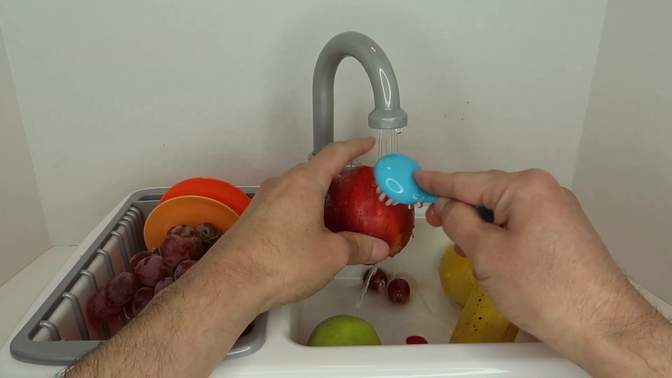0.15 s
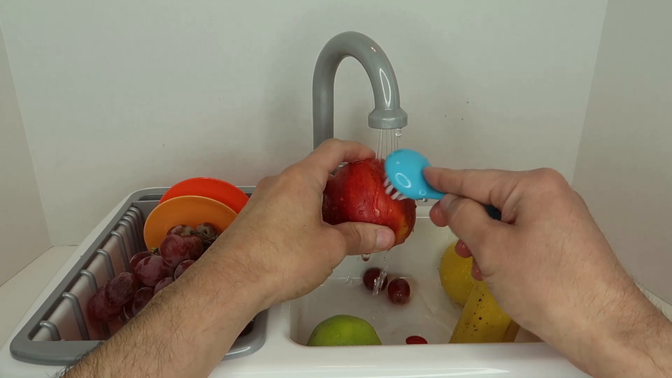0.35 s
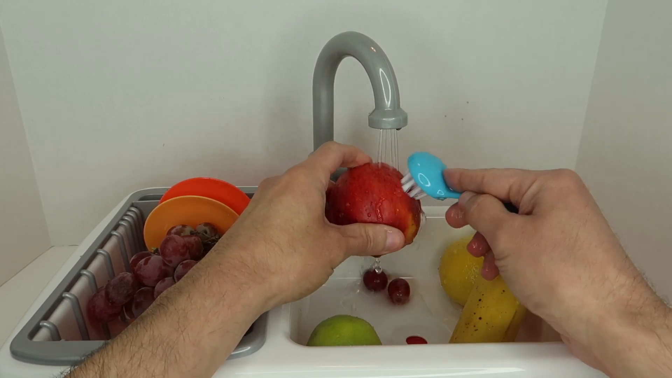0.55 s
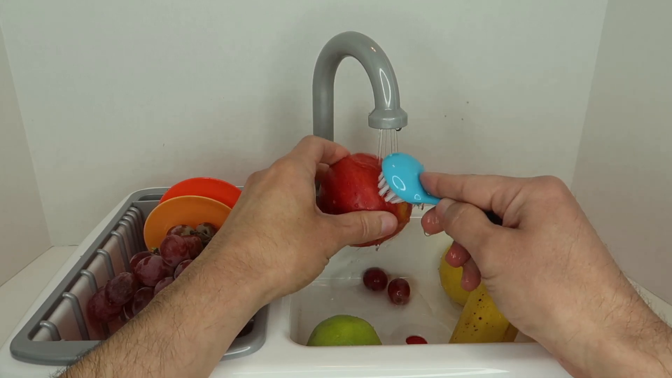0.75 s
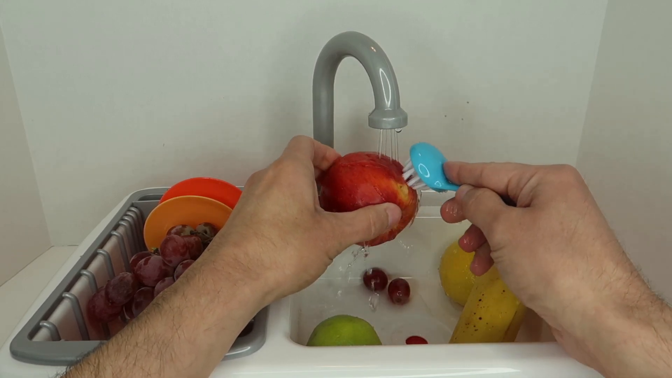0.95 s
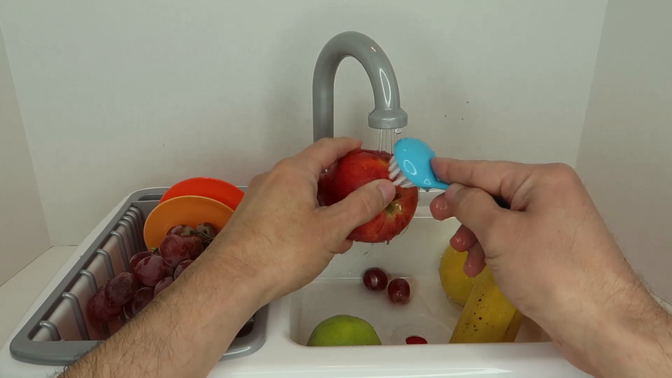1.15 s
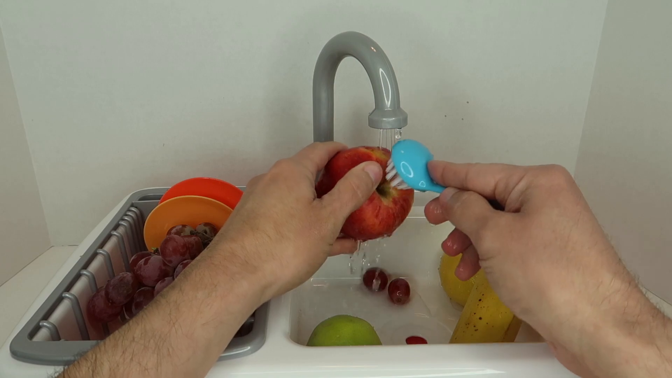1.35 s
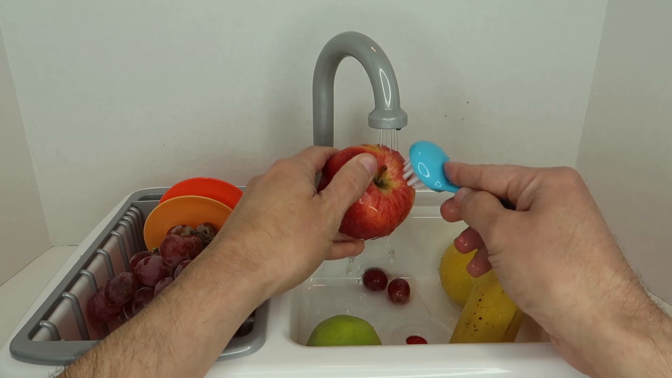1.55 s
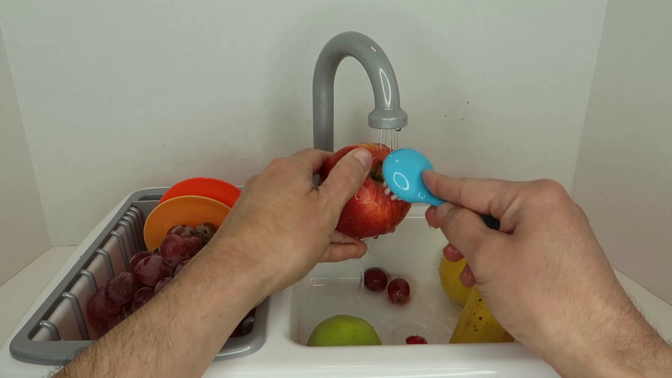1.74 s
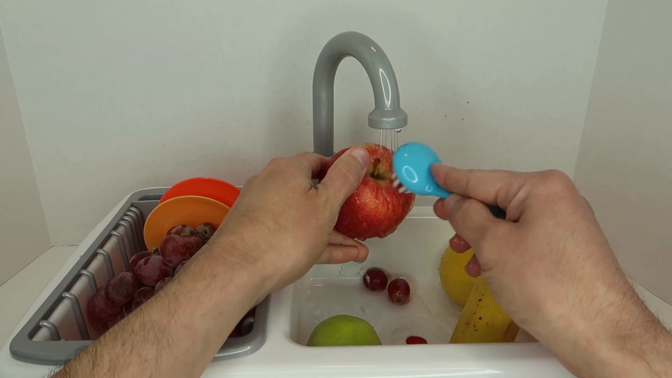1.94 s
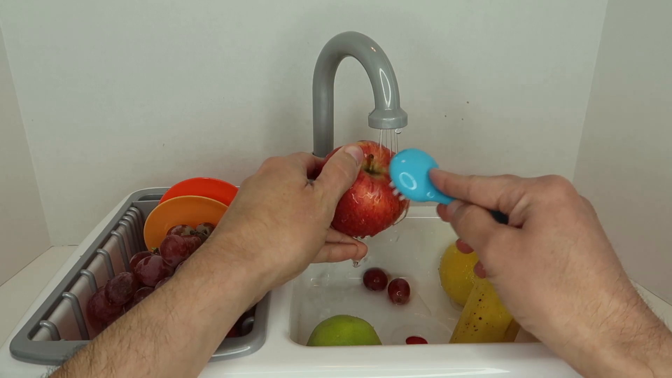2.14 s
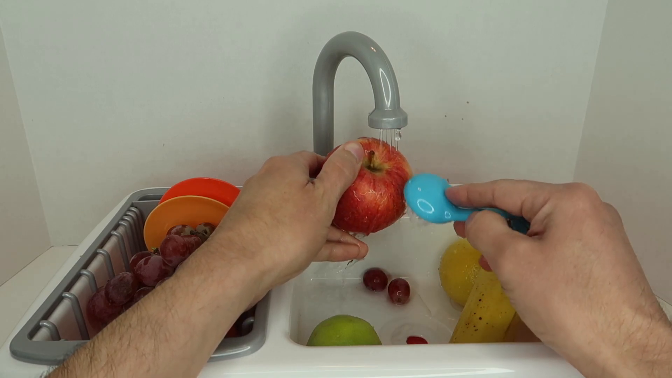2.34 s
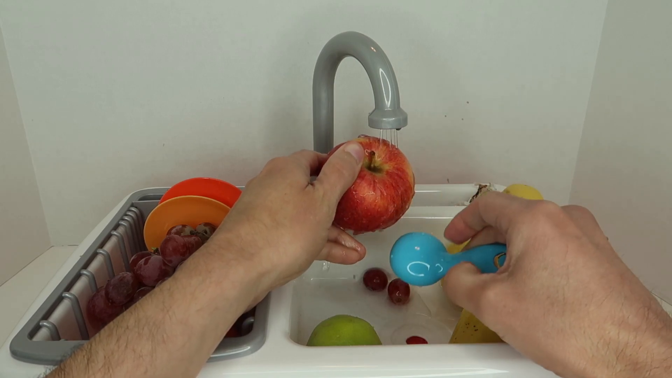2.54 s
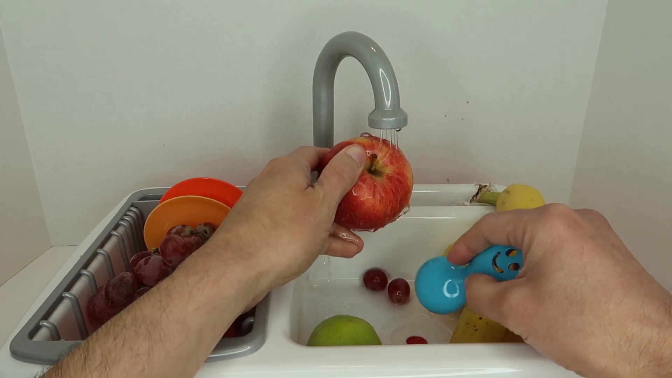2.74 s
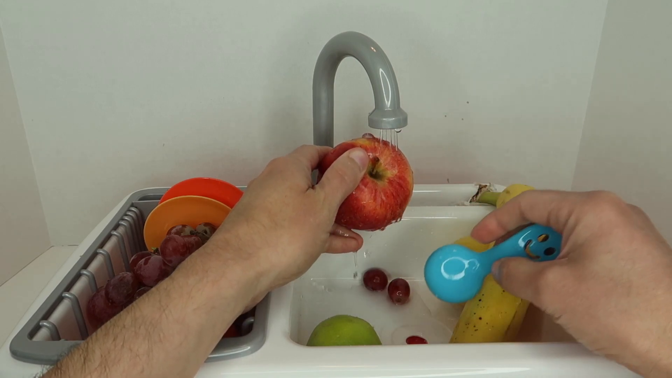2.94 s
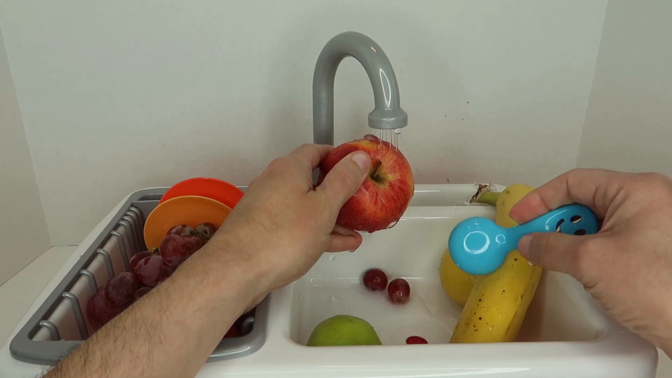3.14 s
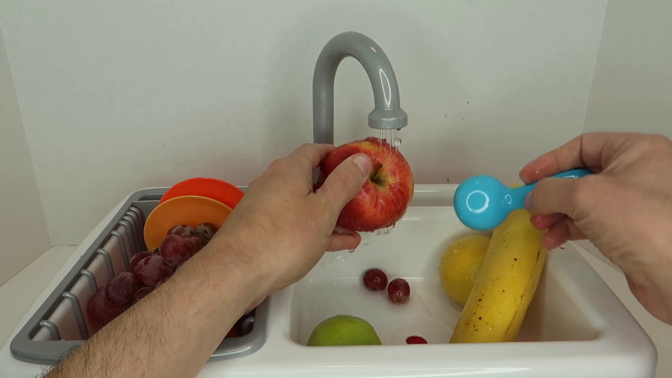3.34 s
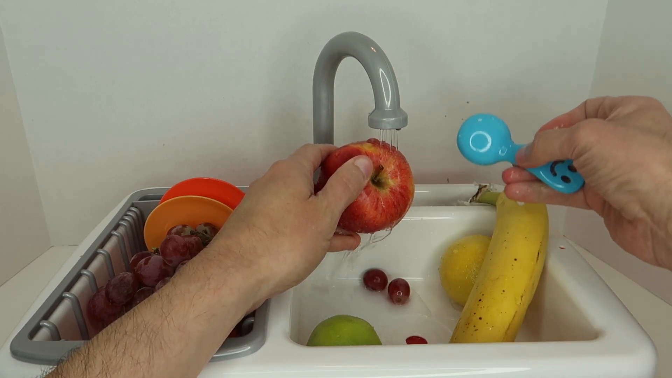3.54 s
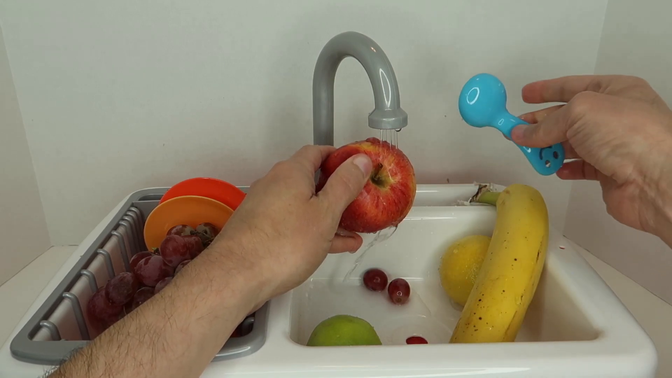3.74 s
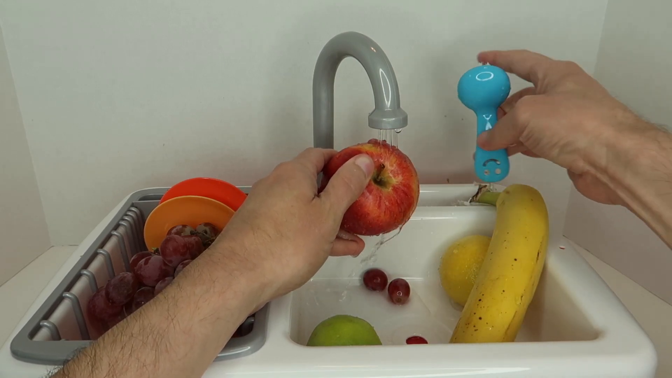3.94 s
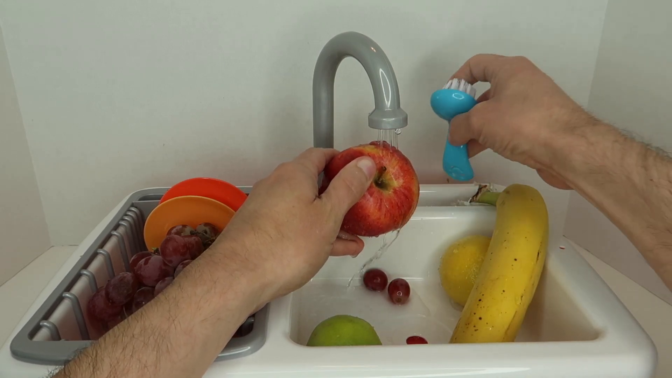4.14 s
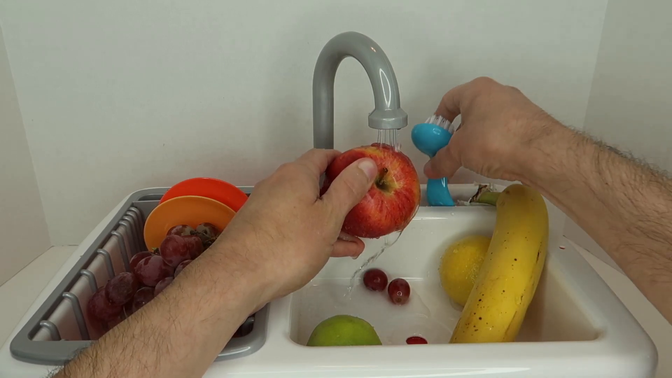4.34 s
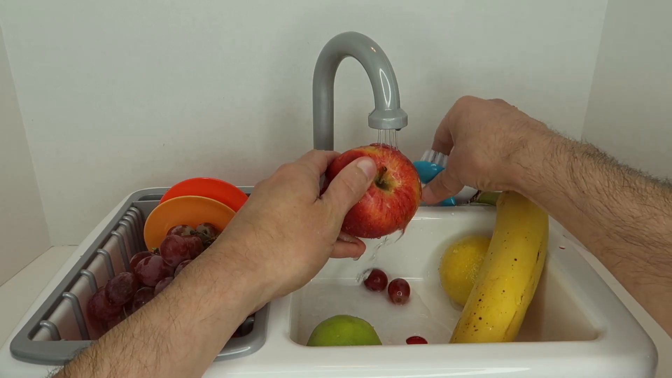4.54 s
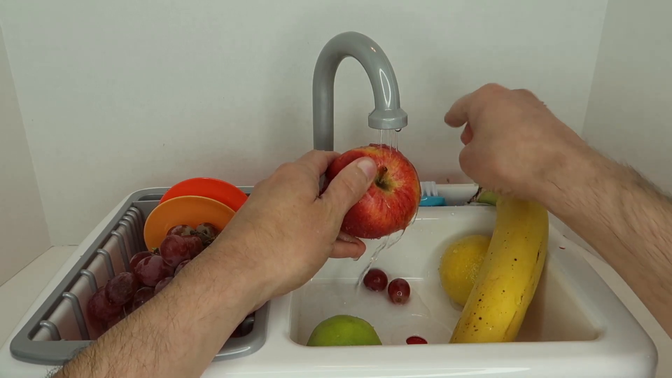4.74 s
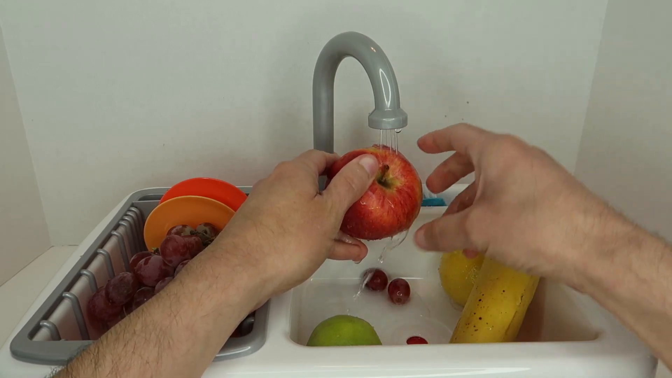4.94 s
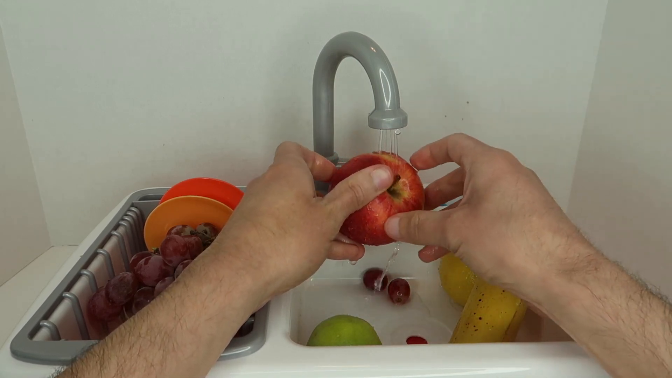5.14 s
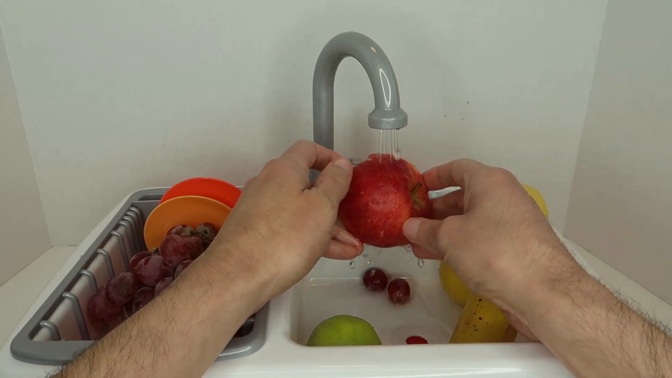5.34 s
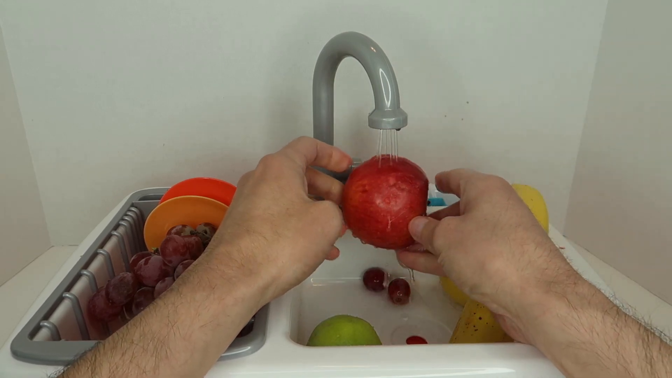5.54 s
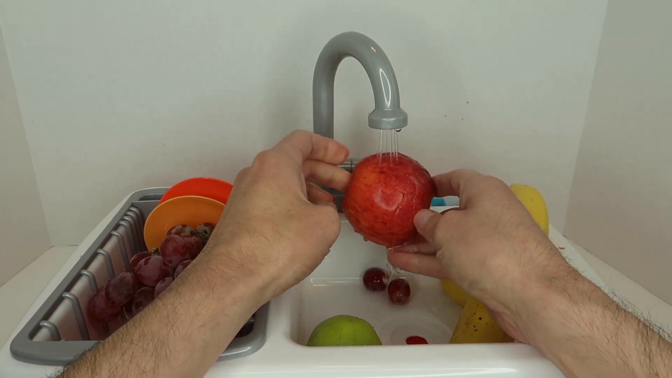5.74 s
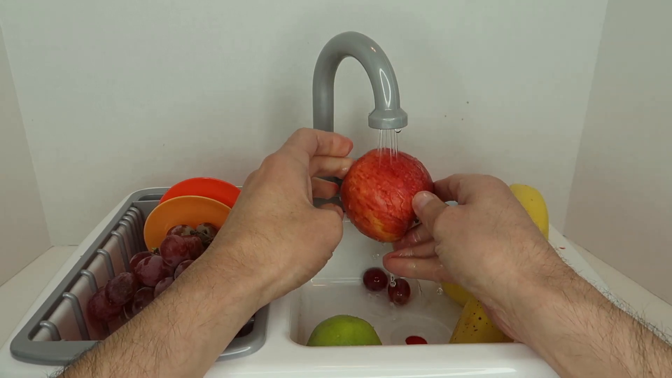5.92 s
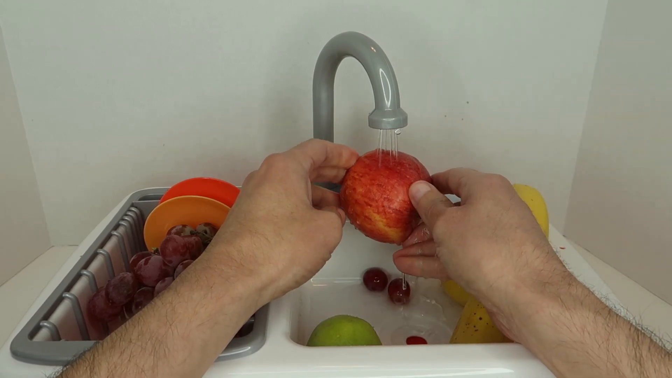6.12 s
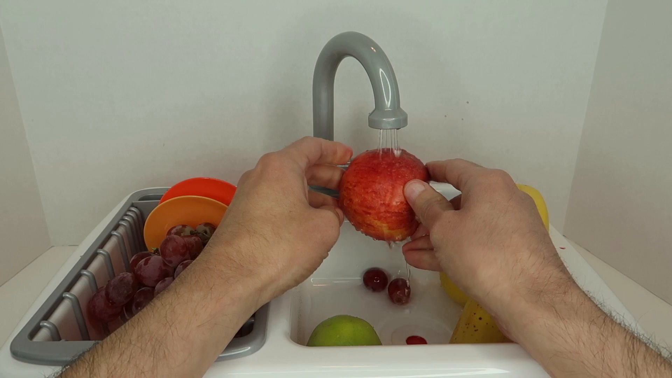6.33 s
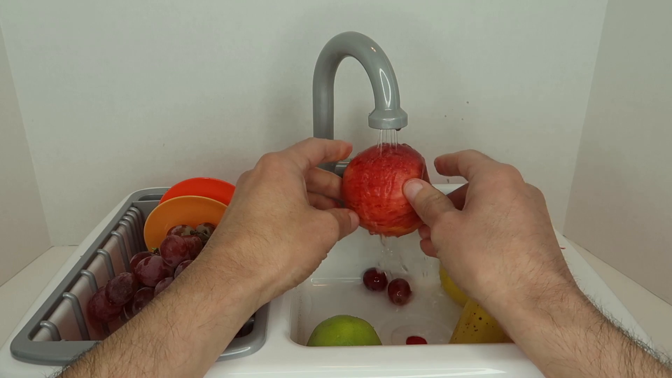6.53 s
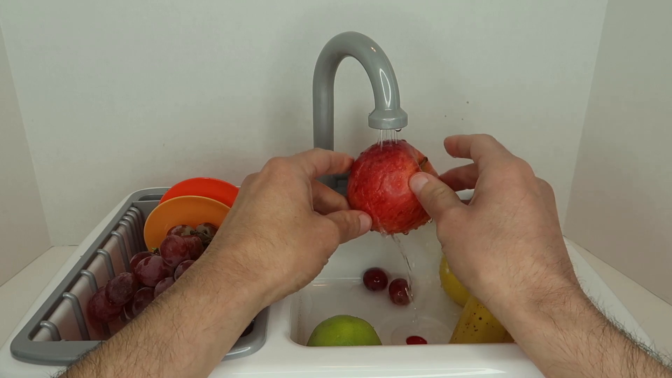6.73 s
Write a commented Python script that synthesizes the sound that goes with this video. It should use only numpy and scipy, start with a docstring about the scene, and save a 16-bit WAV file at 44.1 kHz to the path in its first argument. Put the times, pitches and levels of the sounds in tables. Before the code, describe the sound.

Throughout about 6.9 seconds, a toy sink's small battery pump whirs with a steady, slightly wavering buzz and quick gear rattle, above quiet room air and a low electrical hum. A thin, uneven trickle splashes over an apple and into a plastic basin. From 0 to 2.4 seconds a little brush scrubs with crisp, hissy strokes about six per second, with drips, small knocks and slight wet squeaks near 0.36 and 2.3. Scrubbing stops; sparse wet clicks continue. Soft low bumps accompany the reaching arm from 3.8 to 5. Light plastic taps at 4.44 and 4.67 precede a very loud hollow clatter at 4.8, bouncing until 4.9 with a short room tail. The close microphone overloads and the background ducks, recovering over the next couple of seconds. Pump and trickle carry on, with a sharper drip around 6.7 and stronger splashing at the end.

```python
"""A toy sink's battery pump hums and rattles while its thin stream trickles over an apple.
A small brush scrubs and knocks, then drops on the hollow plastic rim with a loud clatter.
Pump tones follow the shaft; gears, water and bristles are shaped noise; struck plastic is dying sines.
The near microphone overloads, ducks and recovers; a fridge motor and the mains hum low in the room."""
import sys
import numpy as np
from scipy import signal
from scipy.fft import rfft, irfft
from scipy.io import wavfile
from scipy.ndimage import uniform_filter1d

SR = 44100
rng = np.random.default_rng(int(sys.argv[2]) if len(sys.argv) > 2 else 0)


def put_to_file(sound):
    """Save the sound as 16-bit audio at rate SR, in the file named by the first command-line argument."""
    columns = np.atleast_2d(sound).T  # one column per channel
    safe = np.clip(columns, -1, 1)
    whole_steps = np.round(safe * 32767)
    wavfile.write(sys.argv[1], SR, whole_steps.astype(np.int16))


N = 303408
TIME = np.arange(N) / SR


def amp(db):
    """Decibels to gain."""
    return 10 ** (np.asarray(db) / 20)


def unit(x):
    """Scales to rms 1."""
    return x / np.sqrt(np.mean(x ** 2) + 1e-20)


def curve(rows):
    """Joins (t/s, value) rows by straight lines."""
    return np.interp(TIME, *np.transpose(rows))


def read(points, hz):
    """Reads (f/Hz, value) rows on a log-frequency axis."""
    f, value = np.transpose(points)
    return np.interp(np.log(hz + 1), np.log(f + 1), value)


def add(mix, s, sound):
    """Adds a sound at time s."""
    part = mix[round(s * SR):][:len(sound)]
    part += sound[:len(part)]


def colour(x, points, peaks=(), size=8192):
    """Causal filter of unit energy from a spectrum and resonant lifts."""
    hz = abs(np.fft.fftfreq(size, 1 / SR))
    db = read(points, hz)
    for f, width, lift in peaks:
        db = db + lift / (1 + (2 * (hz - f) / width) ** 2)
    # minimum phase: the filter answers as early as its spectrum allows
    spectrum = np.exp(np.conj(signal.hilbert(np.log(amp(db)))))
    taps = np.fft.ifft(spectrum).real[:size // 2]
    return signal.oaconvolve(x, taps / np.linalg.norm(taps))[:len(x)]


def dying(t60, size=8192):
    """Exponential decay, down 60 dB after t60 seconds."""
    return np.exp(-np.log(1000) * TIME[:size] / t60)


def burst(t60, size=8192):
    """A dying puff of noise."""
    return rng.standard_normal(size) * dying(t60)


def wander(hz, size=16384):
    """Slow chance of rms 1, up to about hz."""
    real, imaginary = rng.standard_normal((2, size))
    fade = np.exp(-(np.arange(size) * SR / N / hz) ** 2)
    return unit(irfft((real + 1j * imaginary) * fade, N))


def ringing(modes):
    """A struck object: dying sines from (f/Hz, level/dB, t60/s) rows."""
    return sum(amp(db) * np.sin(2 * np.pi * hz * TIME[:8192]) * dying(t60) for hz, db, t60 in modes)


# pump speed before its waver: t/s, speed/(turns/s)
PUMP_SPEED = [(0, 27.83), (1.2, 27.82), (2.7, 27.9), (4.4, 27.765), (6.88, 27.85)]


def shaft(wobble_turns=0.006):
    """Turns of the pump shaft so far, wavering with the load."""
    return np.cumsum(curve(PUMP_SPEED)) / SR + wobble_turns * wander(7.5)


# pump tones before flutter: multiple of the turning rate, rms level/dB
PUMP_TONES = [(7, -62.5), (8, -60.5), (9, -63), (11, -63.5), (12, -57), (13, -61), (14, -61), (15, -60),
              (16, -50), (17, -60), (18, -60), (21, -59), (22, -68.5), (24, -65.5), (26, -66), (27, -62),
              (31, -63), (35, -78), (36, -64.5), (38, -77), (39, -69.5), (42, -74), (44, -70.5),
              (51, -64.5), (52, -74), (53, -65), (54, -67.5), (57, -64.5), (59, -67), (61, -69), (62, -81)]


def motor(turns, flutter=0.17):
    """Tones on multiples of the turning rate, wavering with the load."""
    out = np.zeros(N)
    for multiple, db in PUMP_TONES:
        level = amp(db) * np.sqrt(2) * (1 + flutter * wander(20))
        out += level * np.cos(2 * np.pi * (multiple * turns + rng.random()))
    return out


# gear ticks and knocks in one turn: place/share of turn, relative level/dB, centre f/Hz, t60/s
GEAR_KNOCKS = [(.05, 5.5, 4700, 0.016), (.065, 5, 1060, 0.018), (0.111, 0.5, 2370, 0.027),
               (.205, 5, 1580, 0.012), (0.334, 0, 785, 0.016), (.4, -1.5, 4500, 0.011),
               (.44, 3.5, 1710, 0.012), (0.544, -1.5, 1550, 0.0065), (.5, 6, 305, 0.021),
               (0.66, 5, 440, 0.017), (.76, -3, 1410, 0.011), (.9, -8, 600, 0.012)]
# rattle spectrum: f/Hz, relative level/(dB per Hz)
RATTLE_SPECTRUM = [(90, -8.5), (180, 4), (450, 4), (650, -3.5), (1000, -0.5), (1320, 1.5), (1600, -6),
                   (2400, -8.5), (4000, -12.5), (6000, -19), (7500, -19), (12000, -56), (16000, -50)]
# resonances of the pump housing: f/Hz, width/Hz, lift/dB
HOUSING_PEAKS = [(726, 59, 11), (1020, 86, 4.5), (1317, 58, -6), (1461, 53, 7.5), (1602, 42, 12),
                 (1704, 51, 11), (1988, 90, 13), (2154, 140, 6), (2375, 81, 6.5), (2854, 62, 14),
                 (3214, 55, 12), (3940, 184, 11), (4270, 79, 11), (4670, 120, 13), (4930, 120, 2),
                 (5550, 260, 13), (5830, 230, 9), (6130, 150, 7.5)]
TAP_TOP_HZ = 2140  # low-pass corner of the clean gear taps; above it the churn takes over


def pump(turns, rattle_db=-51.0, rough=0.58, uneven_db=1.2, churn=0.1):
    """Gears knock at the same places in every turn and ring the housing."""
    rattle = np.zeros(N)
    for share, db, hz, t60 in GEAR_KNOCKS:
        at = np.searchsorted(turns, np.arange(share, turns[-1], 1))
        hits = np.zeros(N)
        hits[at] = amp(db + uneven_db * rng.standard_normal(len(at)))
        # part of each knock is a clean tap that repeats, part is churned water
        tap = hits * np.linalg.norm(dying(t60))
        tap = signal.lfilter(*signal.butter(2, TAP_TOP_HZ, fs=SR), tap)
        churned = (churn + signal.oaconvolve(hits, dying(t60))[:N]) * rng.standard_normal(N)
        band = signal.butter(1, [hz / 1.6, hz * 1.6], "band", fs=SR)
        rattle += signal.lfilter(*band, np.sqrt(1 - rough) * tap + np.sqrt(rough) * churned)
    return amp(rattle_db) * unit(colour(rattle, RATTLE_SPECTRUM, HOUSING_PEAKS))


# water falling on the apple and basin: t/s, spray level/dB
STREAM_FLOW = [(0, -59), (2.6, -62), (3.3, -69), (3.7, -60.5), (5.1, -70), (5.8, -63), (6.45, -66),
               (6.6, -54.5)]
# splash spectrum, for stream and wet clicks: f/Hz, relative level/(dB per Hz)
SPLASH_SPECTRUM = [(300, -46), (900, 14.5), (2500, 5.5), (6000, 0), (9000, -6.5), (13000, -11.5),
                   (16000, -20)]


def trickle(drops_per_s=450, spread_db=5, drop_t60=0.015, pops_per_s=60, pop_db=-7, pop_t60=0.051,
            count=24):
    """Tiny splashes and popping air pockets follow the flow of the stream; large pockets ring longer."""
    def drops(per_s):
        """Chance impacts, a few of them much stronger."""
        strength = amp(spread_db * np.minimum(rng.exponential(1, N), np.e))
        return strength * (rng.random(N) < per_s / SR)

    spray = signal.oaconvolve(drops(drops_per_s), dying(drop_t60))[:N] * rng.standard_normal(N)
    pitches = np.geomspace(650, 9000, count)
    pops = np.zeros(N)
    for hz in pitches:
        size = np.sqrt(pitches[0] / hz)
        pops += size * signal.oaconvolve(drops(pops_per_s / count), bubble(hz, pop_t60 * size))[:N]
    return amp(curve(STREAM_FLOW)) * (unit(colour(spray, SPLASH_SPECTRUM)) + amp(pop_db) * unit(pops))


def bubble(hz, t60, rise_per_s=3):
    """An air pocket rings and rises in pitch as it nears the surface."""
    t = TIME[:4096]
    return np.sin(2 * np.pi * hz * t * (1 + rise_per_s * t / 2)) * dying(t60, size=4096)


# drips, small brush knocks and wet clicks:
# t/s, level/dB, narrow noise ring f/Hz, spray trim/dB, basin plop trim/dB
WET_CLICKS = [(0.2684, -34, 5960, 4.5, 4), (0.481, -43.5, 2540, 10.5, 14), (0.679, -45, 5140, -10, -15),
              (.791, -39.5, 5300, -0.5, -8), (.7985, -41, 6300, 2, 4), (2.2975, -38, 8100, -10, -19),
              (2.562, -39.5, 680, -4, 7), (2.58, -41.5, 8600, -5, -13), (2.8, -48, 7200, -10, -15),
              (3.62, -52, 10500, 4, -12), (3.66, -43.5, 2840, 4.5, 6), (4.2035, -40, 1510, -2.5, 3),
              (4.573, -42, 5540, 3, 7.5), (5.095, -45.5, 3240, 12.5, 15), (5.3322, -44, 11240, 3, -4),
              (5.752, -46.5, 11300, -6, -12), (6.002, -54, 7400, -10, -15), (6.27, -45, 7800, 2, -21),
              (6.57, -54.5, 12500, 14, -10), (6.7142, -32, 5850, -1, -25), (6.8, -52, 9500, 4, -8),
              (6.831, -51, 4700, -3, -17), (6.86, -51, 10500, -8, -17)]


def wet_clicks(stray_db=-57, stray_low_hz=4200, stray_high_hz=12000, stray_spray_db=4, stray_plop_db=-2,
               count=14):
    """The louder drips and brush knocks, and faint stray drips that run off the apple at random."""
    out = np.zeros(N)
    for s, db, hz, spray_db, plop_db in WET_CLICKS:
        add(out, s, amp(db) * wet_click(hz, spray_db, plop_db))
    for when, pitch in rng.random((count, 2)):
        hz = stray_low_hz * (stray_high_hz / stray_low_hz) ** pitch
        add(out, when * N / SR, amp(stray_db) * wet_click(hz, stray_spray_db, stray_plop_db))
    return out


# modes of the basin floor: f/Hz, relative level/dB, t60/s
BASIN_MODES = [(500, -3, .04), (650, -1, .06), (756, 3.5, 0.056), (895, -3.5, .055), (1230, -8, 0.036)]


def wet_click(hz, spray_db, plop_db, ring_t60=0.025, spray_t60=0.066, splash_db=-6, basin_db=-9):
    """One drip or small knock: a puff of spray, a narrow ring of noise and a plop on the thin basin."""
    spray = amp(splash_db + spray_db) * colour(burst(spray_t60), SPLASH_SPECTRUM)
    plop = amp(basin_db + plop_db) * ringing(BASIN_MODES)
    return cavity(hz, ring_t60) + spray + plop


def cavity(hz, t60, sharpness=9):
    """A small hollow rings: a puff of noise in one steep resonance."""
    peak = signal.iirpeak(hz, sharpness, fs=SR)
    return unit(signal.filtfilt(*peak, rng.standard_normal(8192))) * dying(t60) / np.sqrt(2)


# brush strokes to and fro over the apple: t/s at full pressure, level/dB before the overall trim
BRUSH_STROKES = [(.15, -54), (.3, -51.5), (.485, -54), (.64, -54.5), (.81, -54), (.965, -52),
                 (1.135, -53.5), (1.285, -54.5), (1.47, -56), (1.61, -59.5), (1.765, -54.5), (1.92, -56.5),
                 (2.085, -52.5), (2.25, -55), (2.385, -63)]
# bristle spectrum: f/Hz, relative level/(dB per Hz)
BRISTLE_SPECTRUM = [(1000, -28), (2800, 0), (3900, 4.5), (6500, -5.5), (7800, -3), (13000, -6),
                    (16000, -23)]
# resonances of the brush head: f/Hz, width/Hz, lift/dB
BRUSH_HEAD_PEAKS = [(3740, 280, 4), (4770, 210, 8.5), (6020, 380, 11), (6850, 400, 10)]
# wet bristles squeak on the peel: t/s, level/dB, f/Hz, swell time/s
PEEL_SQUEAKS = [(.3575, -41, 6300, 0.0028), (2.326, -46.5, 4000, 0.0042)]


def scrubbing(grain_db=2.5, grain_hz=1100, clump_db=1.5, clump_hz=70, trim_db=-2.7, swell_s=0.054,
              squareness=3, squeak_sharpness=6):
    """Wet bristles flick over the peel in clumps, swelling with each stroke; now and then they squeak."""
    pressure = sum(amp(db) * np.exp(-abs((TIME - s) / swell_s) ** squareness) for s, db in BRUSH_STROKES)
    clumping = amp(grain_db * wander(grain_hz) + clump_db * wander(clump_hz))
    flicks = rng.standard_normal(N) * clumping
    out = amp(trim_db) * pressure * unit(colour(flicks, BRISTLE_SPECTRUM, BRUSH_HEAD_PEAKS))
    for s, db, hz, rise_s in PEEL_SQUEAKS:
        age = np.maximum(TIME - s, 0) / rise_s
        slip = signal.filtfilt(*signal.iirpeak(hz, squeak_sharpness, fs=SR), rng.standard_normal(N))
        out += amp(db) * unit(slip) * age * np.exp(1 - age)
    return out


# brush strikes on the rim: t/s, level/dB, low corner f/Hz, high corner f/Hz (hardness),
# crack trim/dB, rebound level/dB re the blow
RIM_BLOWS = [(4.4374, -23.5, 800, 906, 5.5, 5), (4.6685, -19, 330, 6030, 10, 6),
             (4.7803, -2, 170, 1090, -9, -2), (4.7856, -7, 200, 700, -11, -17),
             (4.7952, 9.5, 170, 3940, -2, -26), (4.8244, -3, 497, 2000, -28, -26),
             (4.831, -13.5, 900, 6000, 5.5, -14), (4.874, -14, 400, 2000, 6.5, -14),
             (4.879, 4, 200, 300, -23, -20)]
# modes of the hollow sink: f/Hz, relative level/dB, t60/s
SINK_MODES = [(118.4, -33.5, 0.25), (357, -20, 0.039), (445, -13.5, 0.019), (524, -19, 0.073),
              (540, -11.5, 0.027), (607.5, -8, 0.026), (768, -11, 0.0247), (920, -7, 0.021),
              (1032, -4, 0.03), (1064, -21, 0.078), (1175, -4.5, 0.027), (1240, -23, 0.12),
              (1260, -2.5, 0.019), (1360, -25, 0.084), (1688, -9, 0.026), (1700, -25, 0.04),
              (2230, -12.5, 0.018), (2560, -11.5, 0.028), (2510, -40, 0.16), (2580, -34, 0.048),
              (2790, -18, 0.022), (3300, -30, 0.023), (3910, -21, 0.022), (4180, -18, 0.021)]
# crack spectrum: f/Hz, relative level/(dB per Hz)
CRACK_SPECTRUM = [(150, -4), (500, 6.5), (1500, 7), (4000, 2.5), (7000, -8), (12000, -19), (16000, -37)]
# every blow lands twice: delay, share of its corner frequencies, crack trim of the second contact
REBOUND_S, REBOUND_DULLING, REBOUND_CRACK_DB = 0.0061, 0.24, -12


def clatter(crack_t60=0.038, crack_level_db=-13, spread_s=0.00083):
    """The brush touches the rim, falls and bounces; blows crack, ring the sink and land again, duller."""
    out = np.zeros(N)
    # the blow takes a moment to spread over the shell
    ring = -(1 - np.exp(-TIME[:8192] / spread_s)) * ringing(SINK_MODES)

    def contact(low_hz, high_hz, crack_db):
        """A light touch stirs little bass, a soft one little treble."""
        body = signal.lfilter(*signal.butter(2, low_hz, "high", fs=SR), ring)
        body = signal.lfilter(*signal.butter(1, high_hz, fs=SR), body)
        return body + amp(crack_db + crack_level_db) * colour(burst(crack_t60), CRACK_SPECTRUM)

    for s, db, low_hz, high_hz, crack_db, rebound_db in RIM_BLOWS:
        add(out, s, amp(db) * contact(low_hz, high_hz, crack_db))
        rebound = contact(REBOUND_DULLING * low_hz, REBOUND_DULLING * high_hz, REBOUND_CRACK_DB)
        add(out, s + REBOUND_S, amp(db + rebound_db) * rebound)
    return out


# light touches of the hollow brush handle: t/s, level/dB
HANDLE_TOCKS = [(4.4375, -36.5), (4.493, -47), (4.671, -33.5)]
# modes of the handle: f/Hz, relative level/dB, t60/s
HANDLE_MODES = [(960, 3, 0.078), (1038, 9.5, 0.1), (1166, -3, 0.05)]
# spots of plastic that ring as the brush tumbles on the rim: t/s, level/dB, f/Hz
PLASTIC_TICKS = [(4.672, -25, 246), (4.677, -24, 2230), (4.8245, -24, 2700), (4.833, -27, 3680),
                 (4.872, -20, 3570), (4.877, -18.5, 2110), (4.8785, -11.5, 465)]


def handle(tick_t60=0.032):
    """The handle tocks when it touches the rim; each spot of plastic that is hit rings briefly."""
    out = np.zeros(N)
    for s, db in HANDLE_TOCKS:
        add(out, s, amp(db) * ringing(HANDLE_MODES))
    for s, db, hz in PLASTIC_TICKS:
        add(out, s, ringing([(hz, db, tick_t60)]))
    return out


# hum of the fridge motor (lowest row) and the mains: f/Hz, rms level/dB
ROOM_HUM = [(59.2, -59.5), (120, -49.5), (240, -60.5)]


def hum():
    """Steady low hum of a fridge motor and the mains: sines at random phase."""
    out = np.zeros(N)
    for hz, db in ROOM_HUM:
        out += amp(db) * np.sqrt(2) * np.sin(2 * np.pi * (hz * TIME + rng.random()))
    return out


# room air spectrum: f/Hz, relative level/(dB per Hz)
AIR_SPECTRUM = [(12, -22), (25, -14), (36, 4.5), (55, -22), (85, -3.5), (180, 0.5), (450, -4.5),
                (1400, -13.5), (2600, -18), (5700, -28), (12000, -40.5), (15000, -52)]
# soft low bumps as the arm reaches over the sink: t/s, level/dB
ARM_BUMPS = [(3.75, -49), (3.85, -50), (3.98, -43), (4.1, -35.5), (4.21, -38), (4.32, -38.5), (4.41, -38),
             (4.53, -39.5), (4.65, -37.5), (4.74, -38), (4.9, -36.5), (5.0, -45)]
# bump spectrum: f/Hz, relative level/(dB per Hz)
RUMBLE_SPECTRUM = [(15, -0.5), (30, 5.5), (48, 15), (90, 7), (135, -1), (250, -5.5), (600, -61)]


def background(air_db=-49.5, bump_s=0.042):
    """Room air and the soft low bumps of the reaching arm, both shaped noise."""
    air = amp(air_db) * unit(colour(rng.standard_normal(N), AIR_SPECTRUM))
    swell = sum(amp(db) * np.exp(-((TIME - s) / bump_s) ** 2) for s, db in ARM_BUMPS)
    rumble = signal.hilbert(colour(rng.standard_normal(N), RUMBLE_SPECTRUM))
    # dividing by the root of its envelope evens out the rumble
    even_rumble = rumble.real / np.sqrt(abs(rumble) + 1e-9)
    return air + swell * unit(even_rumble)


# decay of the room: f/Hz, t60/s
ROOM_DECAY = [(100, 0.36), (500, 0.425), (1500, 0.335), (5000, 0.31), (14000, 0.34)]


def room(x, first_s=0.00032, size=22050):
    """Dense reflections from near walls, each band dying at its own speed."""
    noise = rng.standard_normal(size) * (TIME[:size] > first_s)
    hz, t, bands = signal.stft(noise, SR, nperseg=256)
    decay = np.exp(-np.log(1000) * t / read(ROOM_DECAY, hz)[:, None])
    tail = signal.istft(bands * decay, SR, nperseg=256)[1]
    return signal.oaconvolve(x, tail / np.linalg.norm(tail))[:N]


def difference(x, width, scatter_t60=0.028):
    """What two close ports do not share: scattered sound, shaped by the width table."""
    scatter = burst(scatter_t60)
    spectrum = rfft(x) * rfft(scatter / np.linalg.norm(scatter), N)
    return irfft(spectrum * amp(read(width, np.fft.rfftfreq(N, 1 / SR))), N)


# stereo width of steady sounds: f/Hz, side level/dB re mid, before any side trim
STEADY_WIDTH = [(60, -10.5), (110, -26), (200, -6), (380, -9), (700, -11.5), (1290, -13.5), (2400, -9),
                (4400, -9), (8000, -1), (15000, 1.5)]
# stereo width of blows on the rim: f/Hz, side level/dB re mid
BLOW_WIDTH = [(60, -5), (180, -27), (550, -30), (1650, -20), (4970, -6), (15000, 7)]


def scene(clatter_room_db=-11, water_room_db=-8, click_room_db=-13, motor_side_db=-7):
    """Pump, water and brush in a small room; the motor tones are narrowed and the hum is central."""
    turns = shaft()
    tones = motor(turns)
    water = trickle() + scrubbing()
    clicks = wet_clicks()
    knocks = clatter() + handle()
    knocks = knocks + room(amp(clatter_room_db) * knocks)
    wet = room(amp(water_room_db) * water + amp(click_room_db) * clicks)
    diffuse = pump(turns) + background() + water + clicks + wet
    mid = diffuse + knocks + tones + hum()
    side = difference(diffuse + amp(motor_side_db) * tones, STEADY_WIDTH)
    side += difference(knocks, BLOW_WIDTH, scatter_t60=0.014)
    return np.array([mid + side, mid - side])


EDGE_HZ = 15600  # upper band limit


def record(dry, threshold_db=-14, slope=0.68, recover_db_per_s=8, hold_s=0.053, lag_s=0.011):
    """Gain control ducks after the loud blow, holds and recovers; peaks overload softly; treble is cut."""
    power = uniform_filter1d((np.clip(dry, -1, 1) ** 2).mean(0), size=256)
    over_db = slope * np.maximum(10 * np.log10(abs(power) + 1e-12) - threshold_db, 0)
    last_loud = np.maximum.accumulate(np.where(over_db > 0, TIME, -SR))
    recovered_db = recover_db_per_s * np.maximum(TIME - last_loud - hold_s, 0)
    duck_db = np.maximum(np.maximum.accumulate(over_db) - recovered_db, 0)
    # the gain lags behind
    r = np.exp(-1 / (lag_s * SR))
    ducked = dry / amp(signal.lfilter([1 - r], [1, -r], duck_db))
    limited = ducked / (1 + ducked ** 4) ** (1 / 4)
    low_pass = signal.firwin(511, EDGE_HZ, window=("kaiser", 9), fs=SR)
    return signal.oaconvolve(limited, low_pass[None], "same")


dry = scene()
out = record(dry)
put_to_file(out)
```